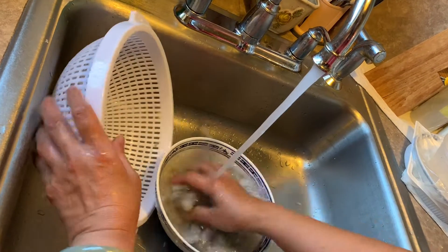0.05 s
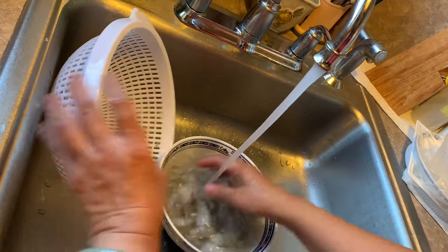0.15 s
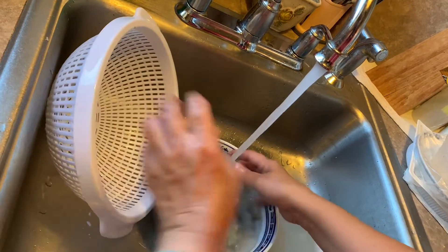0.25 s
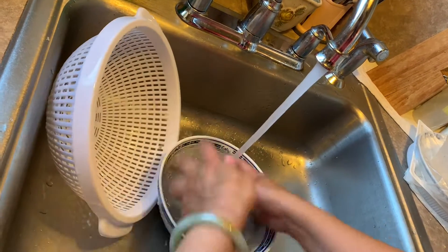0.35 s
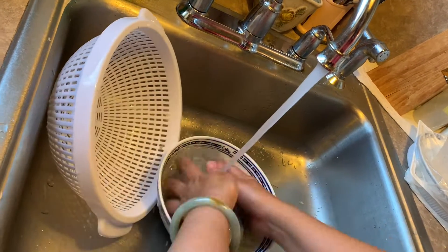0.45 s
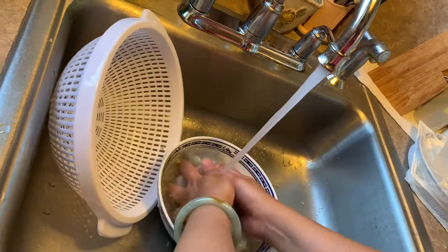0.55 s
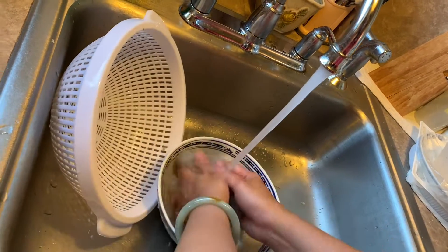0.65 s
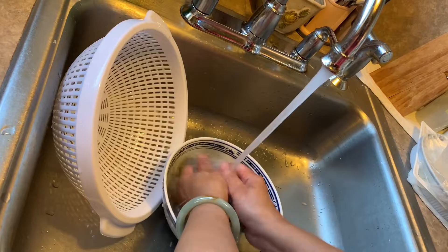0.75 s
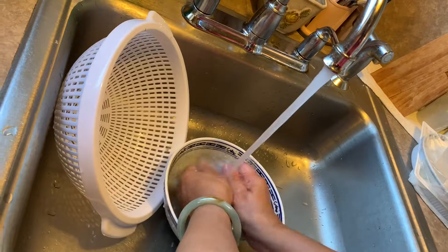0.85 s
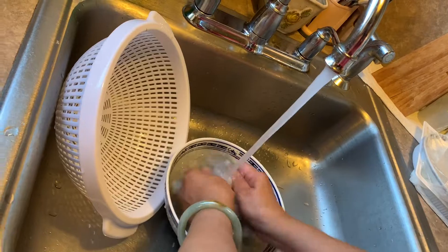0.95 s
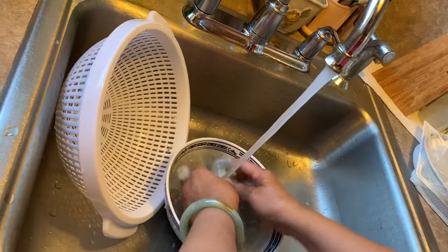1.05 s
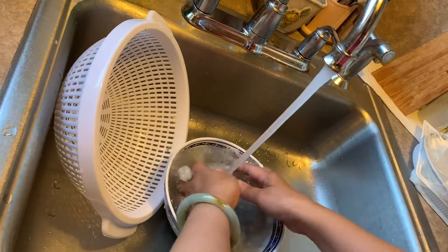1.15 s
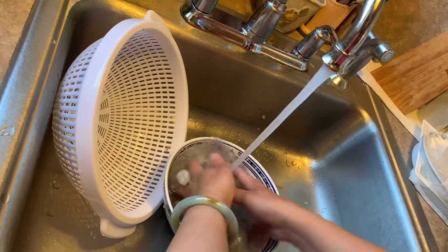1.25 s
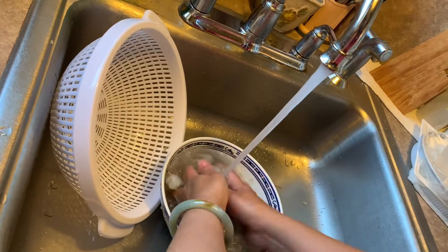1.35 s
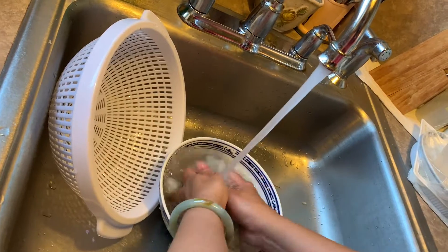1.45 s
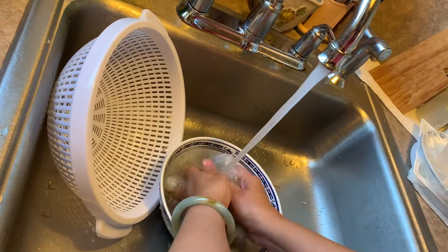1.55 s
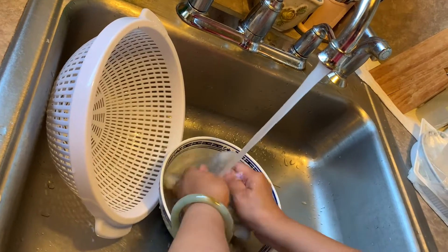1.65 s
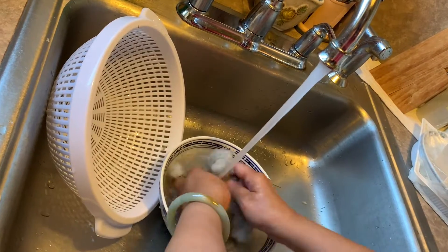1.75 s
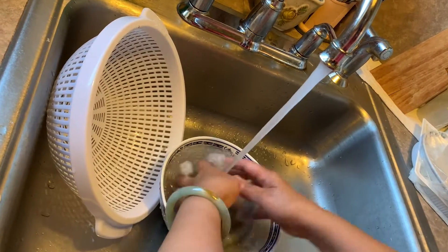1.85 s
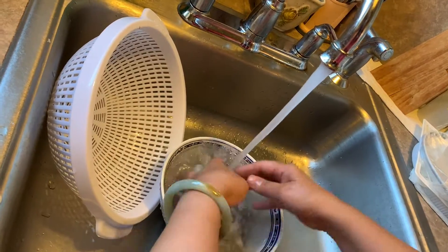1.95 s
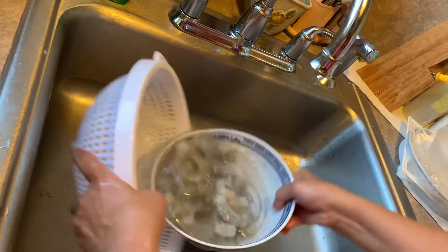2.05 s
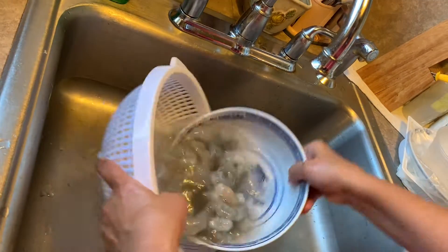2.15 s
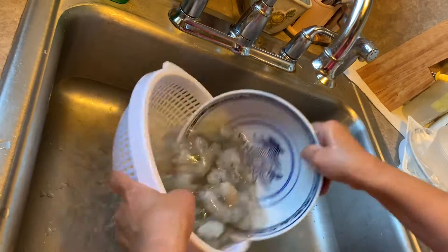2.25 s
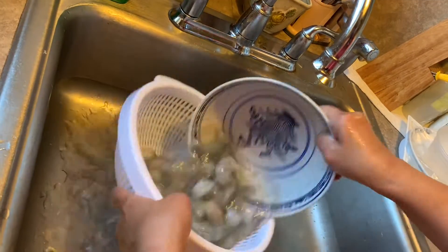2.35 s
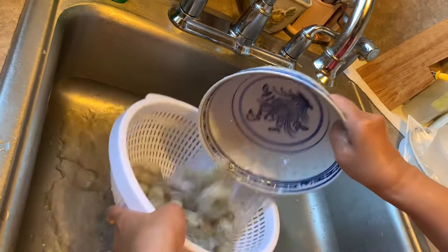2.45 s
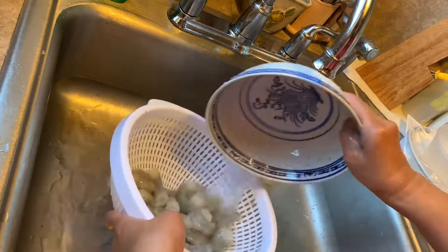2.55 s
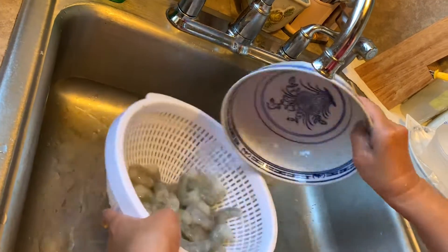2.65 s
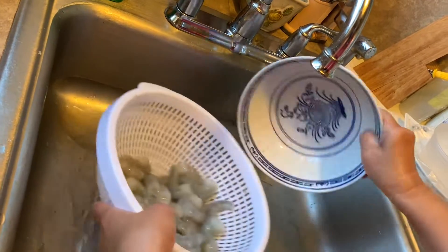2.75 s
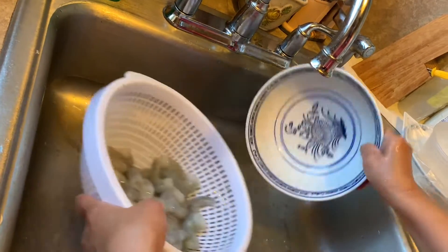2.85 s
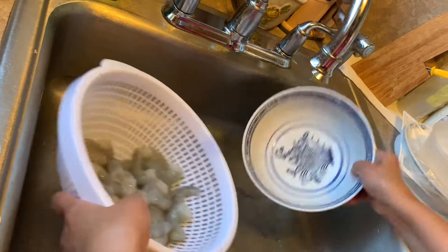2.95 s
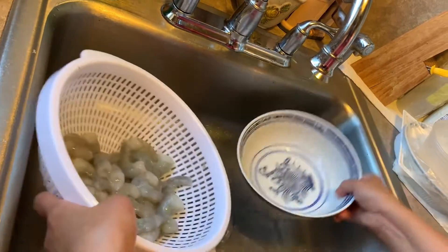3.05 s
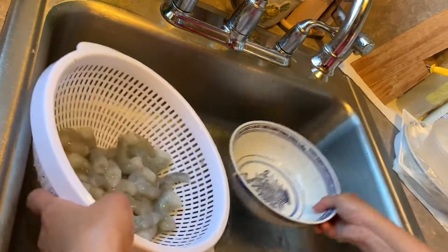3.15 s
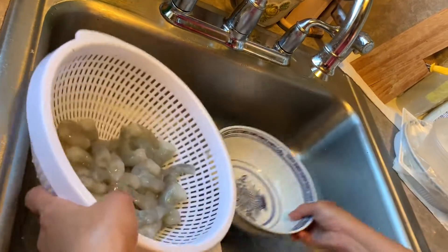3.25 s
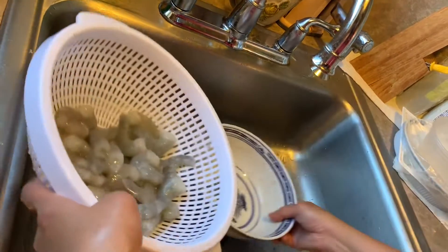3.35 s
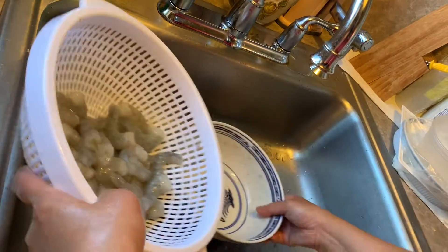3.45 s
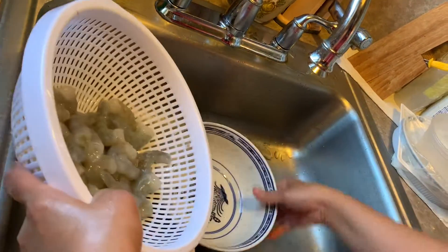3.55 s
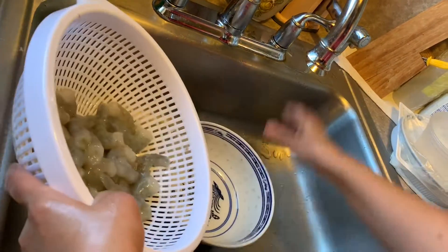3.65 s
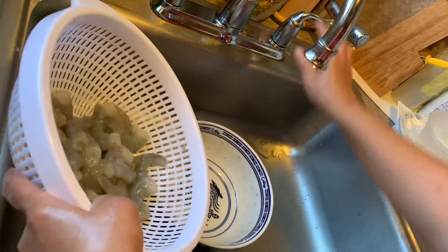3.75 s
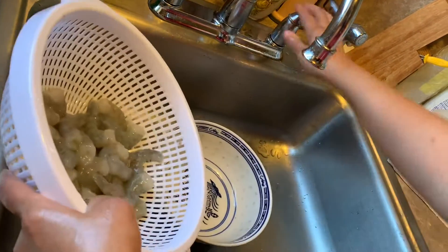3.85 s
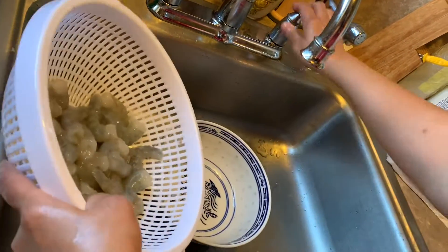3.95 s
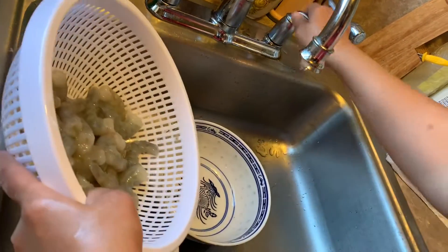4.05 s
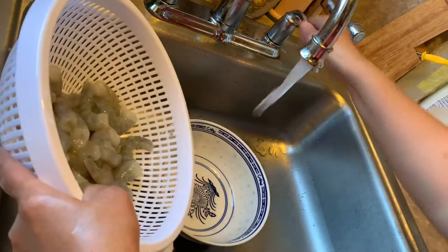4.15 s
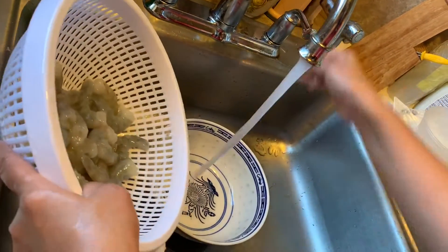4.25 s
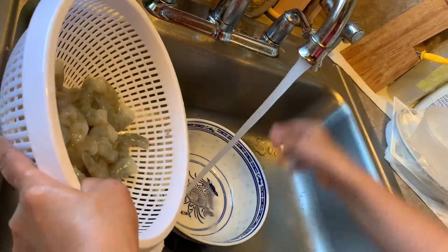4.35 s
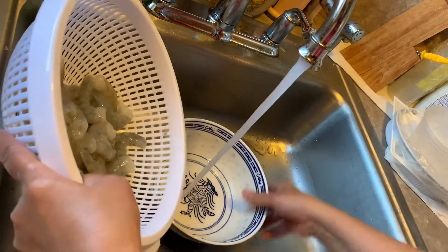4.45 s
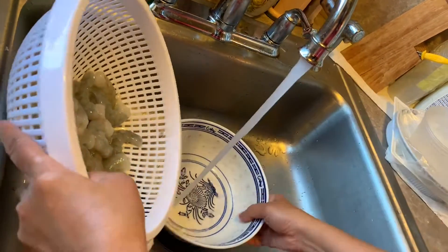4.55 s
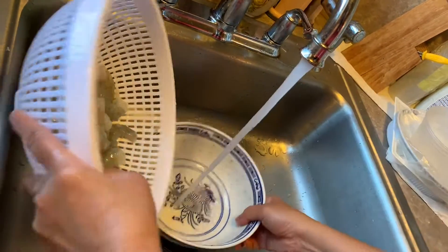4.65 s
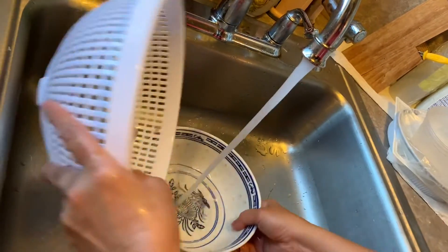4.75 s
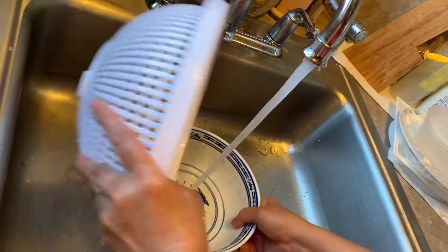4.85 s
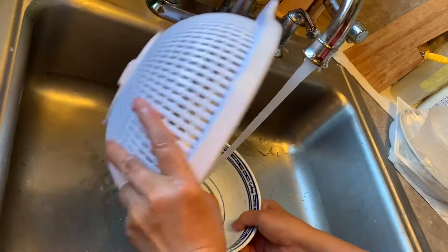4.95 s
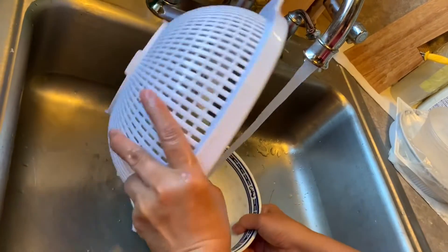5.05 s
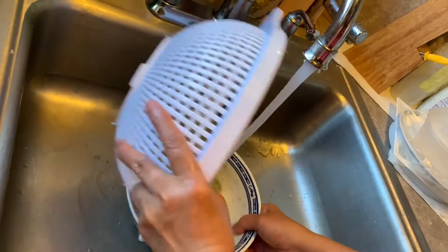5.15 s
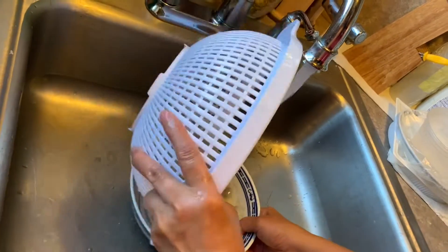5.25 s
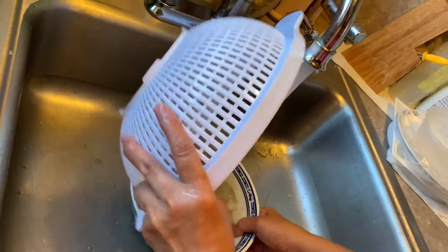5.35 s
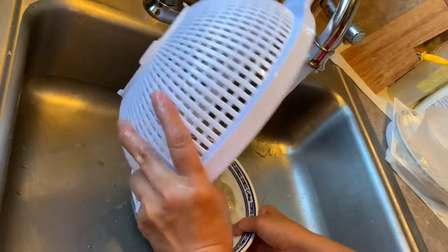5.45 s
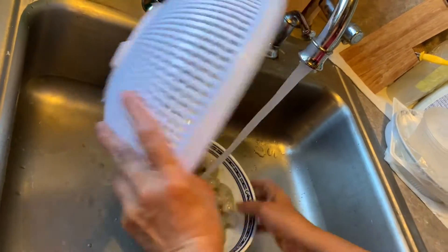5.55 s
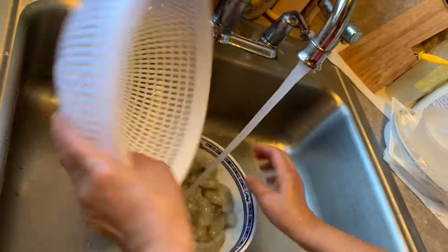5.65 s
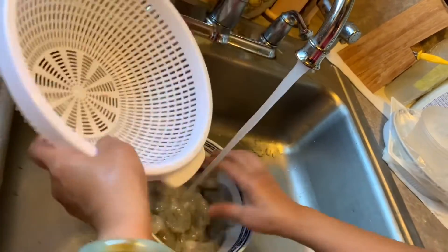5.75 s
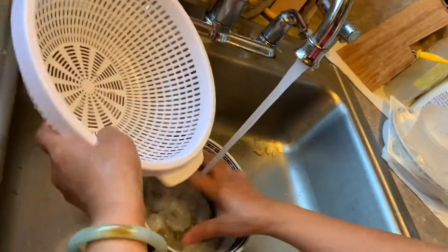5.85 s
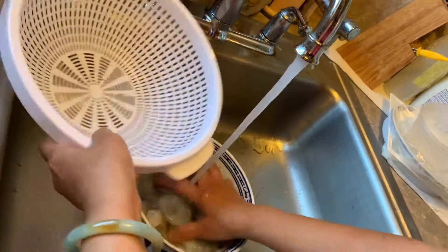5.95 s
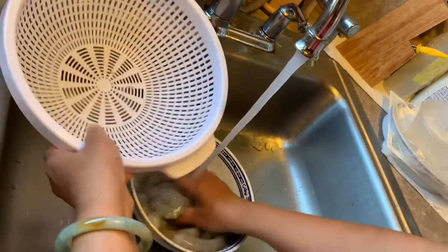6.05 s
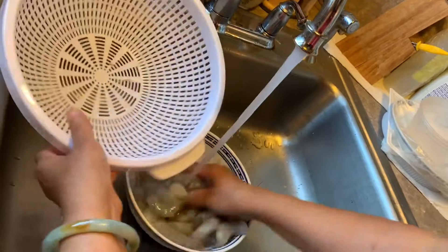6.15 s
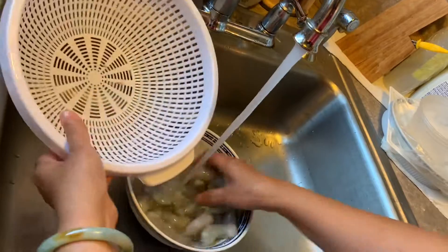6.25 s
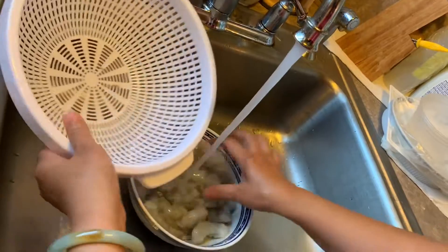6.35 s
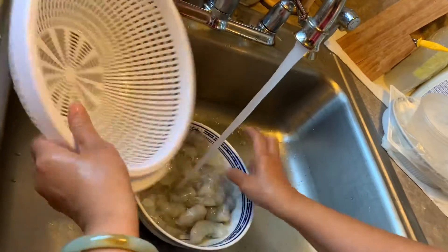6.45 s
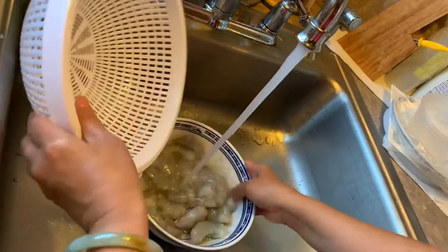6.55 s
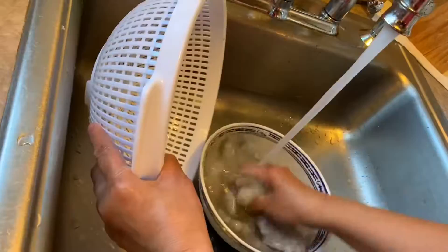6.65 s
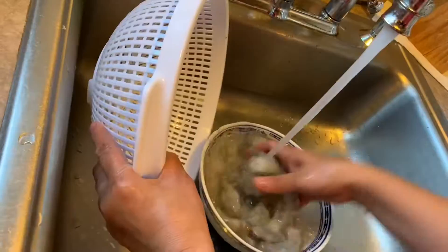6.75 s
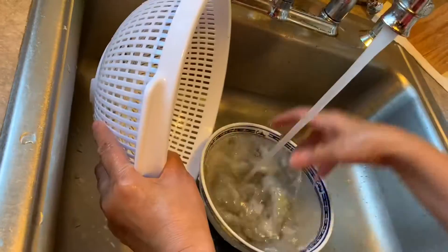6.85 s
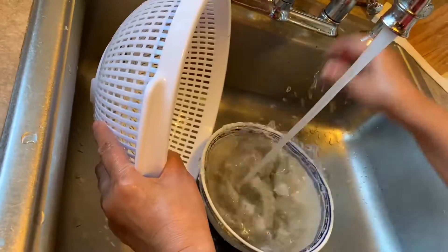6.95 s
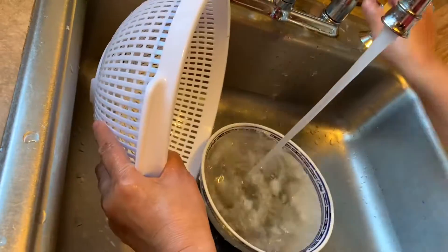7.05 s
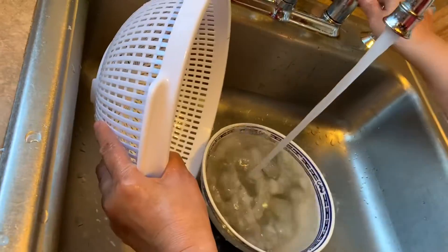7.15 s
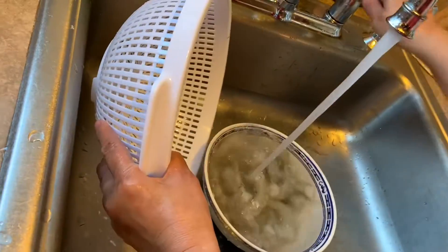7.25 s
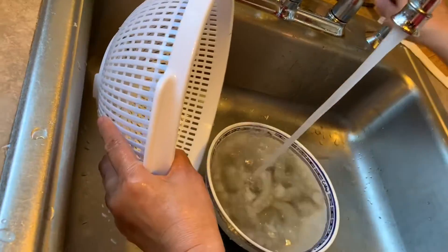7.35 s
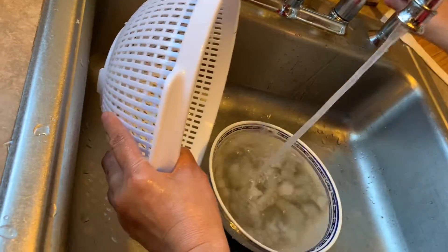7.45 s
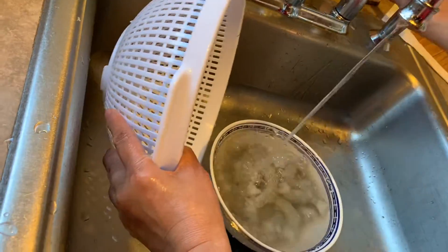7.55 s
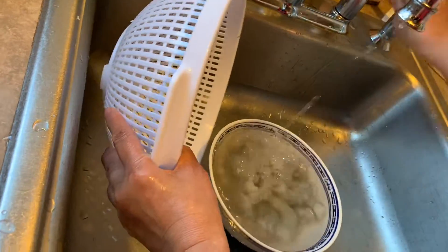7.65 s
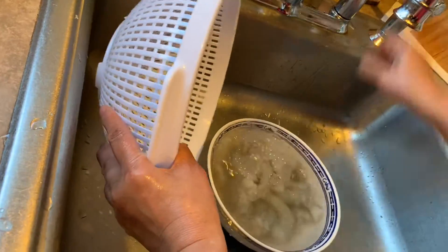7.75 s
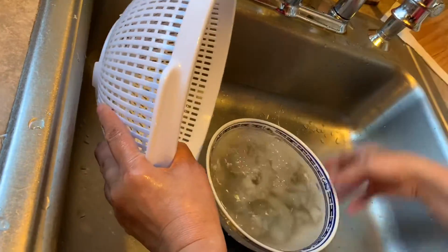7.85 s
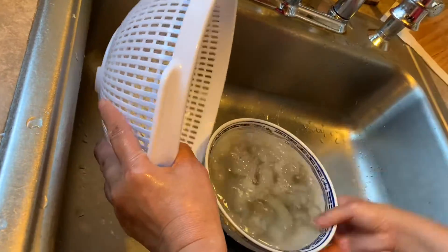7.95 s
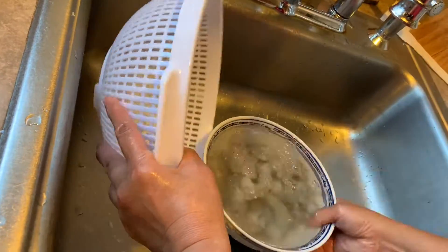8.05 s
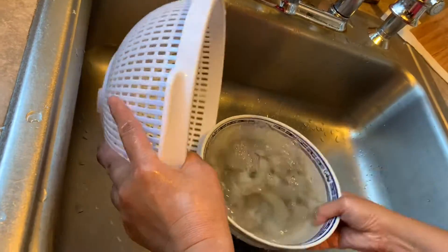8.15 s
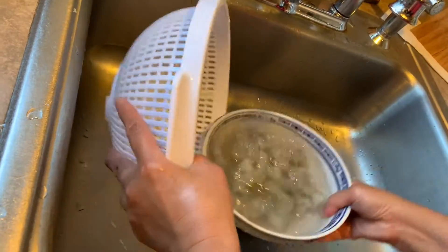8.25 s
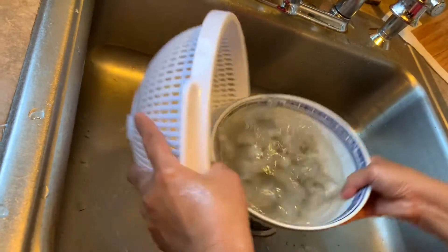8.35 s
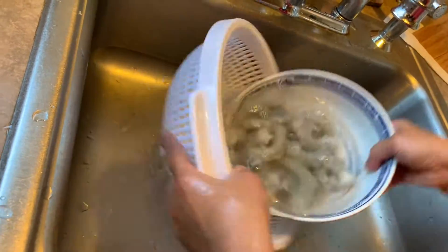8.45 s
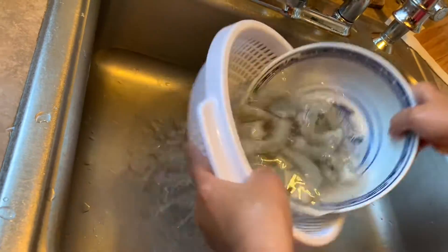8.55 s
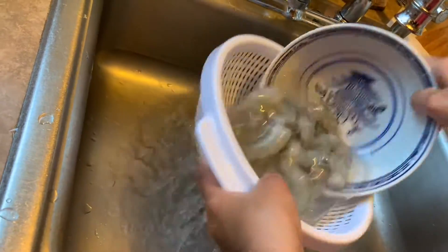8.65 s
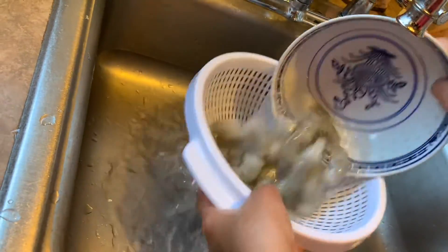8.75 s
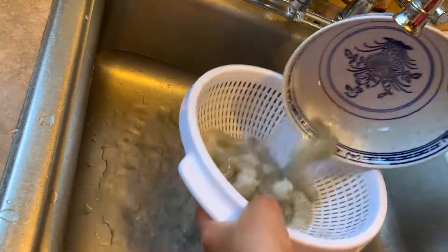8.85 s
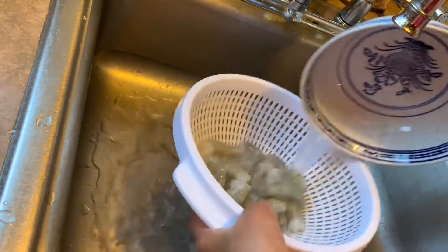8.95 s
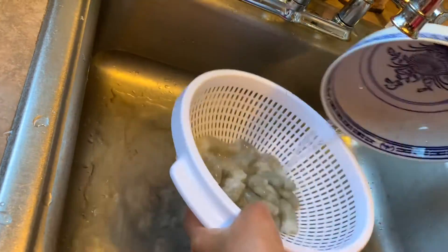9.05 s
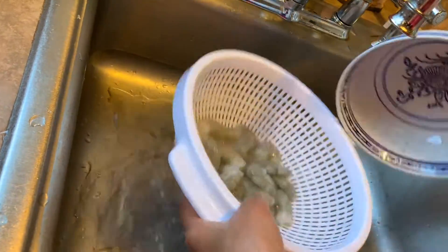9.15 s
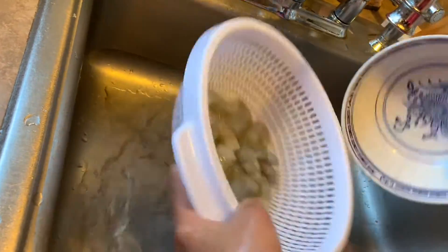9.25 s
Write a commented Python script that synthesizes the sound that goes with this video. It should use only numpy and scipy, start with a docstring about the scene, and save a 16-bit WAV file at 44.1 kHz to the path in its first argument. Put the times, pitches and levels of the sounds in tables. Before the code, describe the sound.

Close, wet kitchen-sink sounds: running tap, gurgling hand-swishing, ceramic clinks, dull plastic bumps, booming steel basin, and two splashy pours through a colander.

```python
"""Tap water hisses and gurgles into a ceramic bowl in a steel sink while hands swish food in it; the bowl is
tipped into a plastic colander, set down, filled again and tipped once more. Bowl and colander knock the
basin, which booms; a kitchen hums softly behind.
Water is patchy coloured noise plus many short damped tones; knocks are sums of decaying modes; the steel
murmurs as noise through its modes, and its walls scatter the sound."""
import sys
import numpy as np
from scipy import signal
from scipy.fft import rfft, irfft, next_fast_len
from scipy.io import wavfile
from scipy.ndimage import uniform_filter1d, map_coordinates

SR = 44100
rng = np.random.default_rng(int(sys.argv[2]) if len(sys.argv) > 2 else 0)


def generate_wav(signal):
    """Clip the signal to [-1, 1] and save it as 16-bit WAV at the path in sys.argv[1]."""
    frames = np.transpose(np.atleast_2d(signal))
    scaled = np.clip(frames, -1, 1) * 32767
    pcm = np.round(scaled).astype(np.int16)
    wavfile.write(sys.argv[1], SR, pcm)


N = 411012

# trapped-air noise spectrum: (frequency [Hz], relative density [dB per Hz])
GURGLE_SPECTRUM = [(350, -9.5), (700, -10.5), (1200, -0.5), (2000, 3), (3000, -3), (4500, 0), (8000, -50)]
# steel basin modes: (frequency [Hz], relative level [dB], nominal t60 [s])
BASIN_MODES = [(148, 1.5, 0.22), (252.8, -9.5, 0.33), (343, -14.5, 0.53), (469, -8, 0.33),
               (602, -13.5, 0.42), (688, -13.5, 0.51), (748, -19, 1), (1069, -12.5, 0.25)]
# modes of the cabinet under the sink: (frequency [Hz], relative level [dB], nominal t60 [s])
CABINET_MODES = [(55.9, 13, 0.54), (92, -3, 0.12)]
# blows on the basin: (time [s], level [dB], boom re blow [dB], lowest mode [Hz], upper modes [dB])
THUMPS = [(0.048, -18, -27, 141, -29), (0.25, -28, -19, 156, -6), (2.532, -30.5, -14, 145, 8),
          (3.354, -9.5, -12, 130.4, -12.5), (3.436, -11.5, -11.5, 127, -16), (3.492, -26, -14, 134, -18),
          (3.529, -22.5, -8, 143, -2), (3.564, -13, -17.5, 153, -8), (3.581, -13.5, -20, 127.6, -7),
          (3.712, -16, -10.5, 149, -2), (3.753, -14, -16, 136.7, -11), (3.799, -26, -29, 136, -1),
          (3.942, -20.5, -31, 144.5, -4.5), (4.12, -29.5, -1.5, 144, 1.5), (4.254, -21.5, -12, 150.4, -7),
          (4.58, -30, -12.5, 141, -19), (4.769, -20.5, -6.5, 137, -24), (4.836, -9, -14.5, 149.7, -12),
          (5.025, -18.5, -20, 141, -13), (5.162, -30, -2, 136, 2), (5.277, -9, -17, 124, -17.5),
          (5.333, -15.5, -26, 147.4, -10), (5.812, -11.5, -19.5, 128.6, -38), (5.859, -27, -33, 133, -31),
          (5.954, -23, -14, 139, -15), (6.022, -23.5, -13, 133, -30), (6.306, -22.5, -4.5, 131.5, -25),
          (6.334, -29, -10, 139, -20), (6.555, -13, -18, 173.5, -11), (6.6, -20, -21, 153, -14),
          (8.68, -34.5, -8, 145, -9), (8.741, -27.5, -18, 148, 0), (8.795, -25, -15, 135, -15),
          (8.876, -16, -12, 136.5, -6), (8.89, -14, -12, 153, -26)]
# colander bumps: (time [s], level [dB], ring length [share of t60], favoured pitch [Hz])
BUMPS = [(0.046, -13, 0.38, 252), (0.152, -15.5, 0.52, 238), (0.17, -31, 1, 670), (0.203, -12, 0.37, 290),
         (0.268, -27, 2.3, 236), (2.279, -20.5, 0.32, 453), (2.536, -23, 0.43, 403),
         (2.69, -18.5, 0.63, 322), (2.744, -11.5, 0.18, 533), (3.428, -21, 0.58, 495),
         (3.446, -22, .3, 650), (3.487, -10.5, 0.35, 640), (3.518, -20.5, 0.44, 520),
         (3.553, -15, 0.3, 570), (3.575, -25, 0.51, 500), (3.605, -35, .5, 610), (3.735, -20, 0.43, 495),
         (3.756, -20, 0.59, 517), (3.778, -33, 0.27, 560), (3.803, -25, 0.35, 495), (4.828, -4, 0.37, 525),
         (4.887, -17.5, 0.71, 500), (4.9, -10, 0.21, 547), (5.15, -25, 0.27, 600), (5.268, -15, 0.22, 667),
         (5.333, -21.5, 0.81, 510), (3.93, -27, 0.32, 505), (3.961, -26, 0.49, 570),
         (6.437, -22.5, 0.32, 450), (6.526, -26, 0.35, 467), (6.553, -26, 0.37, 513),
         (6.606, -27, 0.52, 670), (7.68, -24, 0.17, 523), (8.31, -31, 0.74, 294), (8.335, -22.5, 1.6, 302),
         (8.05, -24, 0.26, 624), (8.378, -10.5, 0.26, 444), (8.399, -20.5, 1, 297), (8.868, -13, 0.18, 477),
         (8.877, -14.5, 1.3, 294), (8.904, -18, 1.8, 250), (8.957, -41, 1.2, 248), (9.052, -35, 4.6, 267),
         (9.091, -26.5, 0.61, 416)]
# offset from a row's level to its sum of modes or noise: {object: gain [dB]}
RING_DB = {"basin": -1.06, "cabinet": 4.5, "bowl": -8, "clatter": -9, "colander": -5}


def amp(db):
    """dB to gain."""
    return 10 ** (np.asarray(db) / 20)


def unit(x):
    """Scaled to rms 1."""
    return x / np.sqrt(np.mean(x ** 2) + 1e-20)


def along(points, hz):
    """(Hz, value) points interpolated on a log-frequency axis."""
    f, v = np.transpose(points)
    return np.interp(np.log(hz + 1), np.log(f + 1), v)


def wobble(rate_hz):
    """Smooth random curve, rate_hz knots a second."""
    knots = rng.standard_normal(int(N * rate_hz / SR) + 4)
    return map_coordinates(knots, [np.arange(N) * rate_hz / SR])


def filtered(x, response):
    """x times a complex response of frequency."""
    m = next_fast_len(N + SR // 2)
    return irfft(rfft(x, m) * response(np.fft.rfftfreq(m, 1 / SR)), m)[..., :N]


def rush(spectrum, patchy_db):
    """Coloured noise of rms 1 with time-frequency patches of random gain."""
    z = signal.stft(rng.standard_normal(N), nperseg=256)[2]
    field = uniform_filter1d(rng.standard_normal(z.shape), size=5, axis=0)
    field = uniform_filter1d(field, size=6, axis=1)
    x = signal.istft(z * amp(patchy_db * unit(field)), nperseg=256)[1][:N]
    return unit(filtered(x, lambda hz: amp(along(spectrum, hz))))


def add(track, s, sound):
    """Mix a sound into a track at s seconds."""
    track[round(s * SR):][:len(sound)] += sound


def ring(modes, share, soft_s, near_hz, fall_db, rough=0.03):
    """One blow: modes weaken by fall_db per octave from near_hz; random phase wander roughens the tones."""
    hz, db, t60 = np.transpose(modes)[:, :, None]
    steps = int(min(.7 * share * t60.max(), 1) * SR / 50)
    t = np.arange(steps * 50) / SR
    db = db + 1.8 * rng.standard_normal(db.shape) - fall_db * np.abs(np.log2(hz / near_hz))
    walk = np.cumsum(rng.standard_normal((len(hz), SR // 50)), axis=1)[:, :steps]
    wander = rough * np.sqrt(hz / 500) * np.repeat(walk, 50, axis=1)
    tones = amp(db - 60 * t / (share * t60)) * np.sin(2 * np.pi * hz * t + wander)
    fade_out = np.minimum(5 * (1 - t / t[-1]), 1)
    return np.sum(tones, axis=0) * (1 - np.exp(-t / soft_s)) * fade_out


def short_tones(count, mid_hz, octaves, cycles, scatter_db, size):
    """Many small damped tones with slightly rising pitch, rms 1."""
    draw = rng.random((count, 2))
    hz = np.clip(mid_hz * 2 ** (octaves * rng.standard_normal((count, 1))), 600, 15000)
    turns = hz * np.arange(size) / SR
    rise = 1 + .025 * turns / cycles
    tone = np.sin(2 * np.pi * turns * rise) * np.exp(-turns / cycles) * np.hanning(2 * size)[size:]
    tone *= 1 - np.exp(-turns)  # soft start
    tone *= amp(-scatter_db * np.log(draw[:, 1:] + 0.0046))  # skewed spread of levels
    at = (draw[:, :1] * N).astype(int) + np.arange(size)
    return unit(np.bincount(at.ravel(), tone.ravel(), N + size)[:N])


def resonant(modes, damping):
    """Unsteady noise through an object's modes, rms 1; wet steel is damped, so the modes are wide."""
    def body(f):
        return sum(amp(db) * 1j * f / t60 / (c * c - f * f + 1j * f * damping / t60) for c, db, t60 in modes)
    return unit(filtered(amp(4.16 * wobble(20)) * rng.standard_normal(N), body))


def flow(tables):
    """Gains of each dB column while a table lasts, silence outside it; tables add."""
    t = np.arange(N) / SR
    return sum(amp([np.interp(t, s, c, left=-200, right=-200) for c in cols])
               for s, *cols in map(np.transpose, tables))


def shudder(blows):
    """Exponentially dying gains after (s, dB) blows: basin and cabinet keep shaking."""
    out, t = np.zeros(N + SR), np.arange(SR // 2) / SR
    rattle_t60_s = 0.28
    for s, db in blows:
        add(out, s, amp(db - 60 * t / rattle_t60_s))
    return out[:N]


def kitchen():
    """Steady low-weighted noise: the room's soft hum."""
    # room noise spectrum: (frequency [Hz], relative density [dB per Hz])
    kitchen_spectrum = [(15, -46), (25, -55), (43, 7.5), (169, -8.5), (298, -6), (339, 0), (450, -13),
                        (695, -13), (845, -17.5), (1400, -18.5), (1900, -23), (2500, -83), (4500, -134),
                        (5850, -65), (9900, -120)]
    return amp(-44.5) * rush(kitchen_spectrum + [(16000, -60)], patchy_db=-2.0)


def tap_hiss():
    """Hiss gain of the tap: level ramps linearly in dB as it opens and shuts."""
    # tap runs: (full flow from [s], until [s], hiss level [dB])
    tap_runs = [(0.0, 1.3, -39.5), (4.2, 7.324, -39.5)]
    opens_db_per_s, shuts_db_per_s = 309, 87
    t = np.arange(N) / SR
    return sum(amp(db - opens_db_per_s * np.maximum(on - t, 0) - shuts_db_per_s * np.maximum(t - off, 0))
               for on, off, db in tap_runs)


def water_gains():
    """Spray and gurgle gains: stream broken on hands, food and bowl, pours, trickle and sloshes."""
    # stream, one table a run: (time [s], spray before layer gain [dB], gurgle before layer gain [dB])
    stream = [
        [(0.0, -45, -41), (.23, -41.5, -48), (.38, -45, -45.5), (.5, -51.5, -46), (.6, -41.5, -42.5),
         (.74, -37.5, -38), (.98, -39.5, -42), (1.1, -46, -43.5), (1.22, -45.5, -55), (1.35, -39, -42.5),
         (1.55, -36.5, -39), (1.78, -45.5, -42.5), (1.89, -49.5, -38), (2.06, -36.5, -46)],
        [(4.1, -60, -57), (4.13, -57, -54), (4.2, -53.5, -52.5), (4.38, -50, -55), (4.42, -35.5, -49.5),
         (4.62, -34.5, -49), (4.93, -36, -45.5), (5.3, -41.5, -40), (5.62, -42.5, -45.5), (5.74, -62, -47.5),
         (5.89, -44, -45.5), (6.12, -37.5, -47), (6.39, -40, -44), (6.52, -36, -46), (6.62, -56, -46.5),
         (7.01, -48, -43), (7.26, -47.5, -49), (7.55, -59.5, -48), (7.85, -70, -65), (8.36, -70, -65)],
    ]
    # bowl emptied through the colander, one table a pour: columns as stream
    pours = [
        [(2.12, -55, -34), (2.22, -41, -47), (2.372, -37.5, -37), (2.492, -40.5, -35.5), (2.618, -38, -33.5),
         (2.796, -47, -45.5), (2.914, -54, -50), (3.02, -82, -73), (3.33, -105, -84)],
        [(8.38, -61, -56), (8.432, -52, -77), (8.528, -47, -47.5), (8.716, -35.5, -38), (8.842, -32, -26.5),
         (8.948, -38, -34.5), (9.138, -41, -38.5), (9.32, -50, -48.5)],
    ]
    # draining water that never quite stops: (spray level [dB], gurgle level [dB])
    trickle_db = (-88.5, -71.5)
    # hands and bowl move: (peak time [s], spray level [dB], gurgle level [dB], fall length [s])
    sloshes = [(0.122, -28, -57, 0.054), (0.318, -38, -43, 0.1), (0.696, -39, -48, 0.058),
               (0.975, -33, -55, 0.067), (1.07, -60, -55, 0.15), (1.177, -33.5, -38.5, 0.2),
               (1.78, -30.5, -68, 0.38), (2.018, -54, -62, 0.079), (2.544, -46, -25.5, 0.06),
               (3.458, -36.5, -35, 0.15), (3.546, -40, -55, 0.069), (3.578, -39, -55, 0.035),
               (3.743, -56, -69, 0.042), (3.802, -42, -72, 0.046), (3.957, -37, -51, 0.02),
               (4.076, -49, -72, 0.026), (4.872, -34, -61, 0.055), (4.962, -29, -37, 0.083),
               (5.243, -27, -46, 0.063), (5.271, -47, -29, 0.063), (5.459, -40, -39, 0.052),
               (5.565, -33.5, -46, 0.42), (6.169, -66, -38, 0.072), (6.283, -28, -36, 0.047),
               (6.39, -24, -60, 0.04), (6.513, -41, -70, 0.25), (6.736, -30, -65, 0.35),
               (6.903, -31.5, -70, 0.13), (7.114, -39, -61, 0.14), (7.656, -42, -40, 0.12),
               (7.747, -44, -44, 0.12), (8.0, -68, -76, .06), (8.386, -44, -32, 0.14),
               (8.855, -53, -33, 0.053)]
    slosh_fall_db, slosh_rise_share = 41.5, 0.37  # fall over one length; the rise is quicker
    t = np.arange(N) / SR
    layer_gain = amp([[4], [-1]])  # spray, gurgle
    wet, air = flow(stream + pours) * layer_gain + amp(trickle_db)[:, None]
    for s, spray_db, gurgle_db, length_s in sloshes:
        near = slice(max(round((s - .3) * SR), 0), round((s + .4) * SR))
        lengths = np.maximum(t[near] - s, (s - t[near]) / slosh_rise_share) / length_s
        swell = amp(-slosh_fall_db * lengths)
        add(wet, near.start / SR, amp(spray_db) * swell)
        add(air, near.start / SR, amp(gurgle_db) * swell)
    return wet, air


def spray(wet, surge):
    """Broken water: patchy bright noise with many short high tones, under fine mist and tap hiss."""
    # spray noise: (frequency [Hz], relative density [dB per Hz])
    spray_spectrum = [(700, -32.5), (1800, -13), (3200, -1), (5000, -1), (6400, 2), (8500, 0.5),
                      (10500, 0.5), (13000, -30)]
    # mist and hiss noise: (frequency [Hz], relative density [dB per Hz])
    mist_spectrum = [(7000, -37), (9000, -17), (11000, -1), (13500, -3.5), (16500, -2)]
    mist_re_spray_db = -3.5
    shorter = short_tones(count=20000, mid_hz=7080, octaves=0.46, cycles=16.0, scatter_db=3.5, size=120)
    longer = short_tones(count=6000, mid_hz=7500, octaves=.4, cycles=36.5, scatter_db=2.5, size=600)
    body = unit(rush(spray_spectrum, patchy_db=4.5) + .5 * shorter + 0.73 * longer)
    mist = np.hypot(tap_hiss(), amp(mist_re_spray_db) * wet) * rush(mist_spectrum, patchy_db=1.5)
    return amp(1.74 * surge + 0.66 * wobble(7)) * (wet * body + mist)


def gurgle(air, surge):
    """Trapped air: mid-band noise with low froth and higher beads of ringing bubbles."""
    froth = short_tones(count=7000, mid_hz=1632, octaves=0.561, cycles=28.0, scatter_db=3.0, size=750)
    beads = short_tones(count=5000, mid_hz=3290, octaves=0.356, cycles=26.0, scatter_db=-0.5, size=700)
    clusters = amp(1.9 * wobble(12))
    body = unit(rush(GURGLE_SPECTRUM, patchy_db=5.0) + 0.54 * beads + 0.77 * clusters * froth)
    return amp(1.76 * surge + 0.93 * wobble(9.5)) * air * body


def steel_murmur(air):
    """A steady low murmur through basin and cabinet modes, shudder after blows, water pattering on walls."""
    basin_db, cabinet_db, patter_re_gurgle_db = -49, -39, -7
    rattle_db, shake_db = -26, -1.5
    basin = amp(basin_db) + shudder([(row[0], row[1] + rattle_db) for row in THUMPS + BUMPS])
    cabinet = amp(cabinet_db) + shudder([(s, db + low_db + shake_db) for s, db, low_db, *_ in THUMPS])
    steel = basin * resonant(BASIN_MODES, damping=7.0) + cabinet * resonant(CABINET_MODES, damping=2.57)
    patter = air * resonant(BASIN_MODES[1:], damping=17.0)
    return steel + amp(patter_re_gurgle_db) * patter


def water():
    """Spray and gurgle swell on a shared random surge, over the steel's murmur."""
    wet, air = water_gains()
    surge = 1.0 * wobble(22) + 0.5 * wobble(55) + 0.45 * wobble(120)
    return spray(wet, surge) + gurgle(air, surge) + steel_murmur(air)


def colander_bumps():
    """Plastic colander: short dull modes, strongest near each bump's favoured pitch."""
    # colander modes: (frequency [Hz], relative level [dB], nominal t60 [s])
    colander_modes = [(181, 7, 0.16), (248.1, 5.5, 0.15), (312, 4, 0.075), (367.5, -8, 1),
                      (426.5, -1, 0.41), (498.2, 3.5, 0.33), (567, -4, 0.24), (666, -2.5, 0.29),
                      (877, -4, 0.23)]
    out = np.zeros(N + SR)
    for s, db, share, hz in BUMPS:
        blow = ring(colander_modes, share=share, soft_s=0.002, near_hz=hz, fall_db=32.0, rough=0.039)
        add(out, s, amp(db + RING_DB["colander"]) * blow)
    return out[:N]


def rim_hums():
    """Thin dry steel rings on, nearly one mode at a time."""
    # rim modes: (frequency [Hz], relative level [dB], nominal t60 [s])
    rim_modes = [(258, -1, 0.99), (330.4, -3, 2.4), (375, -1.5, 1.76), (506, -3.5, 0.69), (614, 0, 1.8),
                 (756, -6, 1.2), (1067, -10, 1.13)]
    # rim set ringing: (time [s], level [dB], favoured pitch [Hz])
    hums = [(0.047, -23.5, 366), (0.048, -23.5, 501), (2.54, -28, 762), (3.349, -33, 331), (3.43, -43, 762),
            (3.441, -40, 1066), (3.589, -49, 1066), (3.736, -43, 1066), (3.76, -37.5, 622),
            (3.93, -34, 762), (3.939, -46, 331), (4.12, -47, 762), (4.83, -34.5, 331), (4.891, -28.5, 501),
            (5.27, -36, 331), (5.335, -46, 501), (8.379, -52, 331), (8.88, -42, 762), (8.95, -29, 258)]
    out = np.zeros(N + SR)
    for s, db, hz in hums:
        blow = ring(rim_modes, share=0.95, soft_s=0.0055, near_hz=hz, fall_db=90, rough=0.018)
        add(out, s, amp(db) * blow)
    return out[:N]


def basin_thumps():
    """Blows ring the basin's modes and boom the cabinet below."""
    out = np.zeros(N + SR)
    for s, db, boom_db, hz, upper_db in THUMPS:
        modes = [(hz, *BASIN_MODES[0][1:])]  # the load in the basin shifts its lowest mode
        for f, level, t60 in BASIN_MODES[1:]:
            modes.append((f * rng.normal(1, 0.00994), level + upper_db + rng.normal(6.8, 2.2), t60))
        blow = ring(modes, share=0.85, soft_s=0.0033, near_hz=hz, fall_db=5.0, rough=0.089)
        boom = ring(CABINET_MODES, share=0.67, soft_s=0.014, near_hz=59.3, fall_db=35)
        add(out, s, amp(db + RING_DB["basin"]) * blow)
        add(out, s, amp(db + boom_db + RING_DB["cabinet"]) * boom)
    return out[:N]


def plops_and_chirps():
    """Single brief damped tones, low plops to high chirps, some with knocks; pitch rises and wavers."""
    # brief tones: (time [s], level [dB], starting pitch [Hz])
    brief_tones = [(0.093, -11.5, 2114), (0.197, -23.5, 1750), (0.27, -21.5, 1120), (0.587, -25, 1100),
                   (0.633, -27, 2520), (0.657, -18.5, 1690), (0.667, -16, 2110), (0.719, -20, 2140),
                   (0.882, -26, 2100), (0.895, -28, 1140), (0.935, -24, 1720), (0.982, -22, 1740),
                   (1.018, -22, 1440), (1.05, -23, 1790), (1.092, -18.5, 1506), (1.128, -23, 1135),
                   (1.454, -23.5, 1650), (1.661, -25.5, 930), (1.771, -29, 1690), (1.869, -11, 7590),
                   (1.875, -24, 1200), (1.974, -25.5, 1070), (2.418, -22.5, 1740), (2.503, -25, 1910),
                   (2.534, -13, 6860), (2.538, -16, 1900), (2.584, -18, 1870), (2.613, -13.5, 1500),
                   (2.64, -11.5, 1493), (2.656, -22, 1490), (2.692, -29, 1460), (2.743, -13.5, 1630),
                   (2.744, -15, 3210), (2.876, -31, 2200), (2.877, -34, 3600), (2.888, -26, 980),
                   (2.902, -31, 2650), (2.919, -29, 1960), (2.928, -35, 1590), (2.957, -46, 3580),
                   (3.045, -42, 2710), (3.141, -38, 2460), (3.08, -40, 1200), (3.156, -35.5, 2540),
                   (3.23, -43, 1320), (3.249, -45, 1280), (4.513, -26, 3180), (4.566, -19, 4200),
                   (4.582, -28, 4200), (4.675, -29, 2600), (4.121, -24.5, 5800), (4.867, -16, 4200),
                   (5.227, -23, 2720), (5.233, -15.5, 1640), (5.451, -30, 1870), (5.527, -24, 1103),
                   (5.559, -24, 1630), (5.562, -24.5, 1110), (5.62, -28, 2594), (5.815, -28, 1230),
                   (6.033, -29, 2140), (6.044, -28, 1220), (6.125, -26.5, 1660), (6.159, -29, 2330),
                   (6.175, -22, 1870), (6.176, -24, 1100), (6.205, -28, 2100), (6.277, -26, 2200),
                   (6.252, -23.5, 3470), (6.333, -19.5, 3580), (6.363, -33, 1600), (6.53, -27, 3150),
                   (6.768, -30, 2390), (6.855, -25.5, 1660), (7.744, -29, 1580), (7.826, -40, 3870),
                   (7.945, -50, 3100), (8.124, -46, 1280), (8.143, -40, 1090), (8.267, -44, 1110),
                   (8.331, -34, 1200), (8.347, -31, 756), (8.59, -21, 4770), (8.649, -21, 2310),
                   (8.708, -24, 1900), (8.752, -31, 2100), (8.804, -13, 2140), (8.809, -14, 1010),
                   (8.865, -15, 3320), (9.039, -17, 910), (9.09, -20, 1520), (9.11, -23, 865),
                   (9.152, -32, 2550), (9.281, -27, 1390)]
    tone_t60_s = 0.031
    out, t = np.zeros(N + SR), np.arange(SR // 5) / SR
    for s, db, hz in brief_tones:
        waver = 1.35 * np.cumsum(rng.standard_normal(len(t))) / 20
        tone = np.sin(2 * np.pi * hz * t * (1 + 1.34 * t) + waver)
        add(out, s, amp(db - 60 * t / tone_t60_s) * tone * (1 - np.exp(-t / 0.002)))
    return out[:N]


def slaps_and_ticks():
    """Slaps and spits of water are sharp noise puffs with a low part; ticks are brief bright noise clicks."""
    # slaps: (time [s], level [dB], low part re slap [dB])
    slaps = [(0.2815, -12.5, -2), (0.54, -14, -23), (1.6929, -10, -26), (1.869, -17, -29),
             (1.965, -15, -17), (2.012, -13.5, -20), (2.033, -28, -20), (2.121, -14, 12),
             (2.247, -11.5, -26), (2.281, -8.5, 6.5), (2.3683, -29, -14), (2.532, -10, 5),
             (2.744, -10.5, 8.5), (3.143, -44, 25.5), (3.3444, -17, -8), (3.4273, -20, -7),
             (3.7244, -20, -11), (3.776, -20, -21), (3.928, -43, 5), (4.074, -24.5, -20), (4.12, -18, -19),
             (4.411, -17, -30), (4.5153, -18, -17), (4.602, -13, -22), (4.8722, -23, -21),
             (5.064, -8.5, -18), (5.147, -9, -3), (5.206, -4, -28), (5.265, -5.5, 1), (5.812, -23, 3),
             (5.949, -31, 11), (5.977, -14.5, 0), (6.252, -13, -5), (6.333, -25, -1), (6.53, -26, -6),
             (6.7324, -24, -23), (6.906, -27, -24), (7.113, -24, -23), (7.602, -50, 3), (7.686, -19, -21),
             (7.739, -25, 7), (7.985, -31.5, -22), (8.0504, -39, -7), (8.3765, -11.5, 12.5),
             (8.5463, -15, -25), (8.644, -13.5, -6), (8.698, -11, -23), (8.779, -12, -15), (8.804, -17, 9),
             (8.863, -4, 4), (9.021, -9, -19), (9.223, -29, 15.5)]
    # ticks, many on the fronts of slaps and knocks: (time [s], level [dB])
    ticks = [(1.87, -11.5), (2.122, -17.5), (2.247, -24), (2.746, -16), (3.929, -34), (4.412, -16.5),
             (4.6, -16), (7.112, -20), (7.744, -25), (8.05, -39), (8.376, -17.5), (8.863, -9), (0.683, -22),
             (.8675, -24), (.9284, -27), (0.9792, -20), (1.168, -30), (1.2282, -24), (1.324, -28.5),
             (1.737, -18), (1.9997, -27), (4.3904, -24), (4.527, -15), (4.7545, -34), (4.816, -16.5),
             (4.8518, -13), (4.9491, -13.5), (5.0868, -17), (5.3616, -24), (5.6198, -27), (5.857, -30),
             (5.9257, -32), (6.2027, -34), (6.289, -22), (6.3626, -19), (6.4384, -16), (6.4728, -17),
             (3.006, -39.5), (3.058, -53), (3.105, -62), (3.124, -61), (3.177, -53), (3.225, -57),
             (3.26, -59), (3.31, -44), (6.89, -24), (6.929, -19), (7.12, -22), (7.439, -28), (7.496, -32.5),
             (7.529, -35), (7.558, -34), (7.621, -56), (7.648, -32), (7.915, -45), (8.18, -50),
             (8.218, -66), (8.238, -58), (8.269, -47)]
    # puff and tick noise: (frequency [Hz], relative density [dB per Hz])
    spit_spectrum = [(700, -17), (1800, -36), (3500, 0.5), (6000, 3.5), (8000, 4), (11000, 1),
                     (16500, -3.5)]
    body_db, front_db, low_part_db = -5.5, -13, -16
    slap_t60_s, front_t60_s, rise_s, tick_t60_s = 0.016, 0.002, 0.0012, 0.0069
    high, low, t = np.zeros(N + SR), np.zeros(N + SR), np.arange(SR // 5) / SR
    for s, db, low_db in slaps:
        body = amp(db + body_db - 60 * t / slap_t60_s)
        front = amp(db + front_db - 60 * t / front_t60_s)
        add(high, s, (body + front) * (1 - np.exp(-t / rise_s)))
        add(low, s, amp(db + low_db + low_part_db - 60 * t / (1.1 * slap_t60_s)))
    for s, db in ticks:
        add(high, s, amp(db - 60 * t / tick_t60_s))
    return high[:N] * rush(spit_spectrum, patchy_db=3.5) + low[:N] * rush(GURGLE_SPECTRUM, patchy_db=4.0)


def bowl_clinks():
    """Ceramic bowl: short modes near a favoured pitch plus a brief noise clatter."""
    # bowl modes: (frequency [Hz], relative level [dB], nominal t60 [s])
    bowl_modes = [(753, -4, 0.22), (1039, -6.5, 0.045), (1209, -2.5, 0.066), (1321, -1.5, 0.074),
                  (1593, -4.5, 0.087), (1918, -0.5, 0.06), (2394, -3.5, 0.072), (3245, -2.5, 0.066),
                  (3520, -21, .05), (6440, -22, .04)]
    # bowl knocked: (time [s], level [dB], clatter re knock [dB], ring length [share of t60],
    # favoured pitch [Hz], fall of other modes [dB per octave])
    clinks = [(2.1195, 1.5, -2, 0.6, 1230, 17), (2.278, -13, -14, 1.3, 1870, 15),
              (2.569, -20, -21, 3.9, 1335, 60), (2.608, -15, -30, 1.2, 724, 40),
              (2.746, 3, -9.5, 0.77, 1010, 53), (3.347, -24, 6.5, 1, 1200, 29),
              (3.428, -9, -10, 1.4, 1330, 24), (3.456, -10, -23, 1.2, 1320, 47),
              (3.483, 0.5, -28, 0.92, 1180, 53), (3.571, -13, -14, 0.8, 1030, 37),
              (3.73, -14.5, 5.5, 0.61, 703, 18), (3.928, -16.5, -3, 0.66, 720, 15),
              (4.079, -28, -21, 1.1, 764, 14), (4.117, -32.5, 2, 0.8, 754, 16),
              (4.828, -15, 7.5, 0.9, 700, 30), (5.266, -12, 2, 0.65, 1510, 14),
              (6.553, -27, 4, 1.7, 1110, 22), (7.745, -34, -13, 0.8, 1610, 14),
              (8.049, -24.5, 2.5, 0.48, 1335, 12), (8.078, -37.5, 2, 1.4, 1060, 25),
              (8.376, -2.5, -3, 0.8, 1180, 24), (8.377, -8.5, -16, 0.71, 1950, 29),
              (8.417, -19, 4, .6, 1200, 10), (8.46, -27, -12, 1.9, 1212, 40),
              (8.862, 5, -5, 0.44, 1630, 32), (8.864, 1, -16, 0.5, 1010, 37),
              (8.889, -10, -10, 1.1, 3280, 25), (8.889, 2, -20, 0.32, 1620, 40),
              (8.909, -5, -14, 0.36, 1615, 50), (9.222, -23.5, 2.5, 0.73, 1060, 19)]
    # clatter noise: (frequency [Hz], relative density [dB per Hz])
    clatter_spectrum = [(300, -8), (700, 8), (1300, 10), (2200, -4.5), (3500, -7), (6000, -5.5),
                        (16000, -26)]
    out, clatter, t = np.zeros(N + SR), np.zeros(N + SR), np.arange(SR // 8) / SR
    for s, db, clatter_db, share, hz, fall_db in clinks:
        blow = ring(bowl_modes, share=share, soft_s=0.0021, near_hz=hz, fall_db=fall_db, rough=0.019)
        add(out, s, amp(db + RING_DB["bowl"]) * blow)
        add(clatter, s, amp(db + clatter_db + RING_DB["clatter"] - 60 * t / (0.04 * share)))
    return out[:N] + clatter[:N] * rush(clatter_spectrum, patchy_db=4.0)


def walls(x, t60_s):
    """The steel walls scatter the sound: a short dense random tail, redrawn sixteen times a second."""
    out, step, t = np.zeros(N + SR), SR // 16, np.arange(SR // 8) / SR
    for start in range(0, N, step):
        tail = rng.standard_normal(len(t)) * amp(-60 * t / t60_s)
        add(out, start / SR, signal.fftconvolve(x[start:start + step], tail / np.linalg.norm(tail)))
    return out[:N]


def scene():
    """Everything sounds inside the basin, over the kitchen's hum; scattered sound widens the stereo."""
    # stereo: (frequency [Hz], left-right likeness [0-1])
    alike = [(60, .999), (200, 0.993), (400, 0.92), (1000, 0.55), (2200, 0.4), (3300, 0.73), (5000, .96),
             (16000, .94)]
    knocks = colander_bumps() + rim_hums() + basin_thumps() + bowl_clinks()
    hits = knocks + plops_and_chirps() + slaps_and_ticks()
    # the basin is too small to scatter the bass
    echo = filtered(walls(hits, t60_s=0.12), lambda hz: hz ** 2 / (hz ** 2 + 1100 ** 2))
    near = kitchen() + water() + hits + amp(-1.0) * echo

    def turn(hz):
        return np.arccos(np.clip(along(alike, hz), 0, 1)) / 2
    mid = filtered(near, lambda hz: np.cos(turn(hz)))
    side = filtered(walls(near, t60_s=0.029), lambda hz: np.sin(turn(hz)))
    return np.array([mid + side, mid - side])


def record(dry):
    """Left lags right by half a turn per 2 kHz above 3 kHz; brief dips, bass cut, soft peaks, band limit."""
    # channel balance: (frequency [Hz], left over right [dB])
    left_over_right = [(125, 0), (350, -1.5), (700, -1), (1400, 2.5), (2800, .7), (5000, 0)]
    # all sound dips briefly: (from [s], to [s], bass [dB], treble [dB])
    dips = [(2.048, 2.086, -13, -13), (6.68, 6.713, -16, -14.5)]
    top_hz = 15900
    t = np.arange(N) / SR

    def channels(hz):
        lag = np.pi * np.maximum(hz - 3000, 0) / 2000
        balance = amp(np.outer([.5, -.5], along(left_over_right, hz)))
        return np.exp(.5j * np.outer([-1, 1], lag)) * balance

    def bass_cut(hz):
        return (1j * hz / (42 + 1j * hz)) ** 3

    def dip(start, end, db):
        return np.interp(t, [start - .008, start + 0.003, end - .012, end], [0, db, db, 0])
    bass = filtered(dry, lambda hz: 1 / (1 + (hz / 1500) ** 4))
    bass_gain = amp(sum(dip(a, b, db) for a, b, db, _ in dips))
    treble_gain = amp(sum(dip(a, b, db) for a, b, _, db in dips))
    dipped = bass * bass_gain + (dry - bass) * treble_gain
    picked = filtered(dipped, lambda hz: channels(hz) * bass_cut(hz))
    rounded = picked / (1 + np.abs(picked / .85) ** 4) ** .25
    return filtered(rounded, lambda hz: hz < top_hz)


dry = scene()
out = record(dry)
generate_wav(out)
```